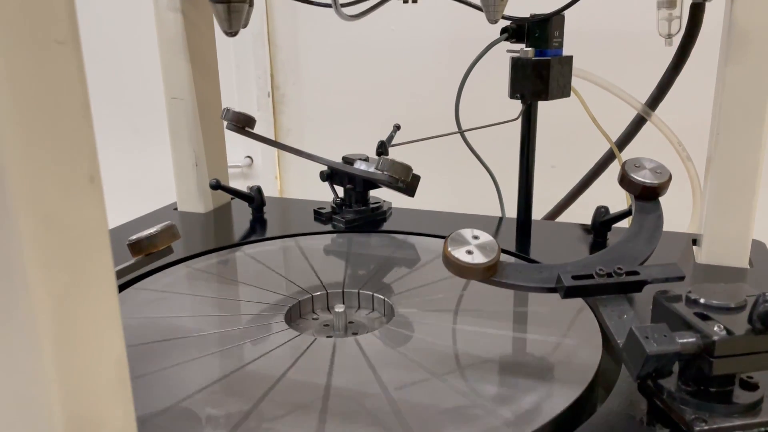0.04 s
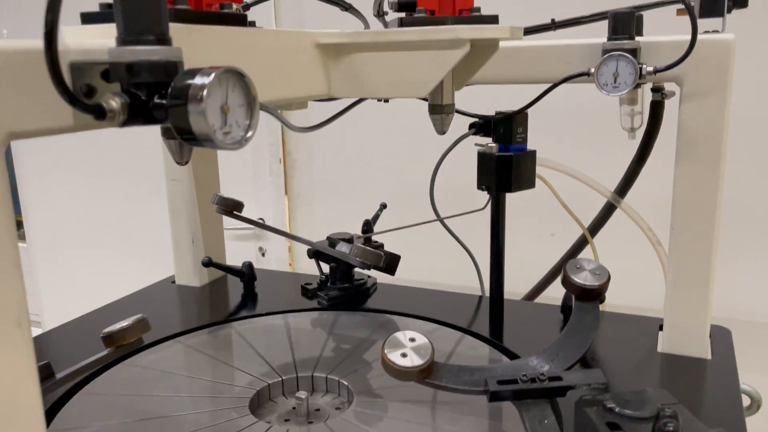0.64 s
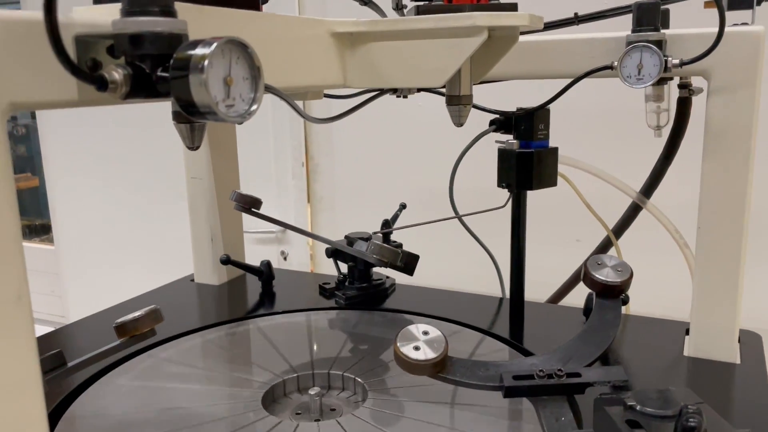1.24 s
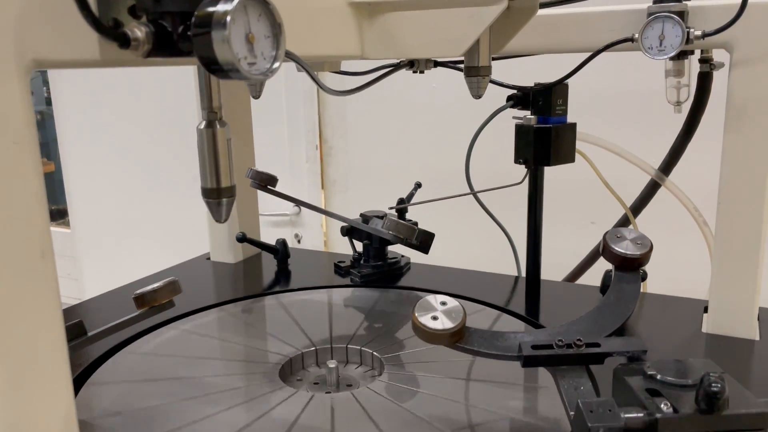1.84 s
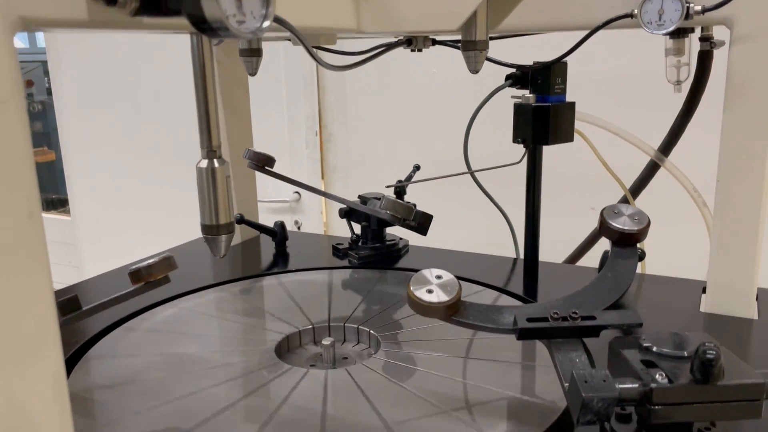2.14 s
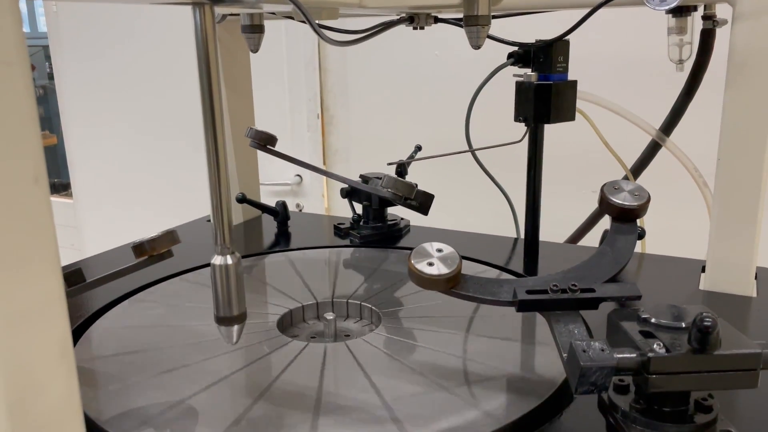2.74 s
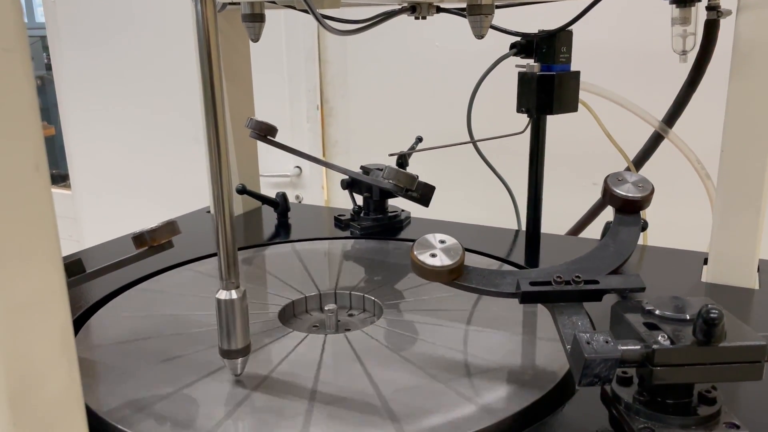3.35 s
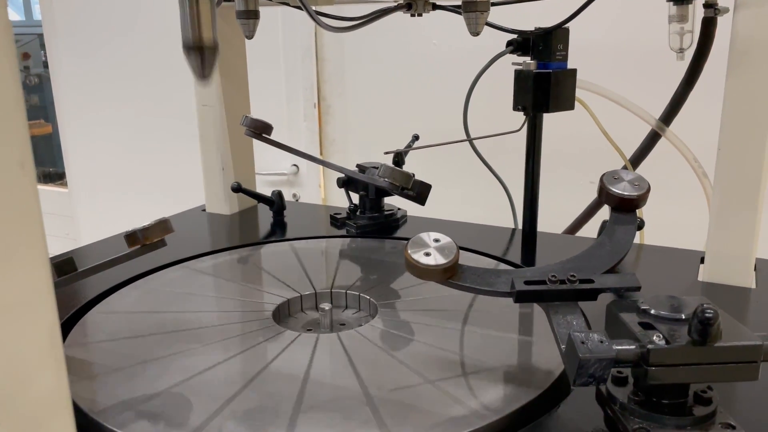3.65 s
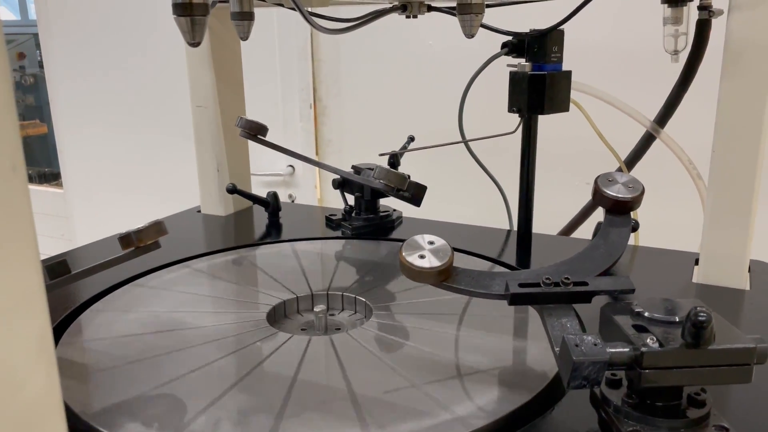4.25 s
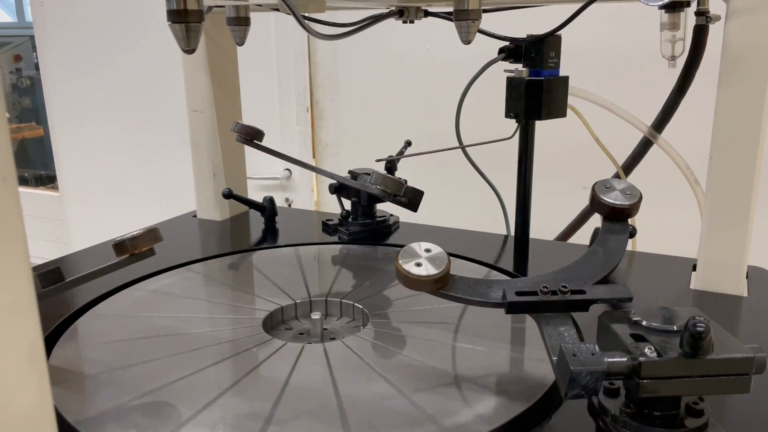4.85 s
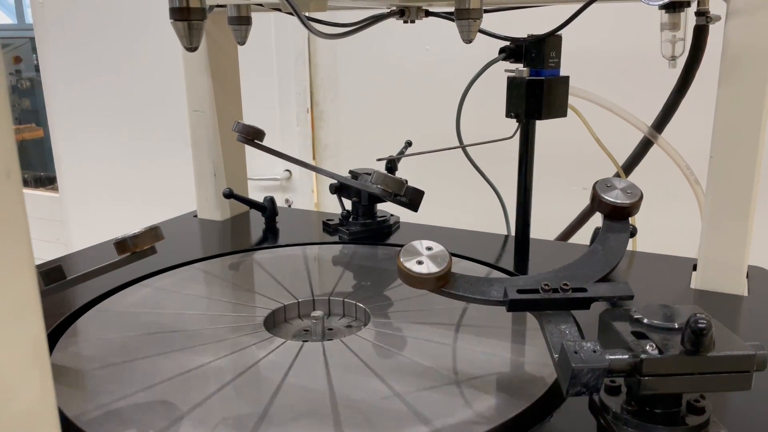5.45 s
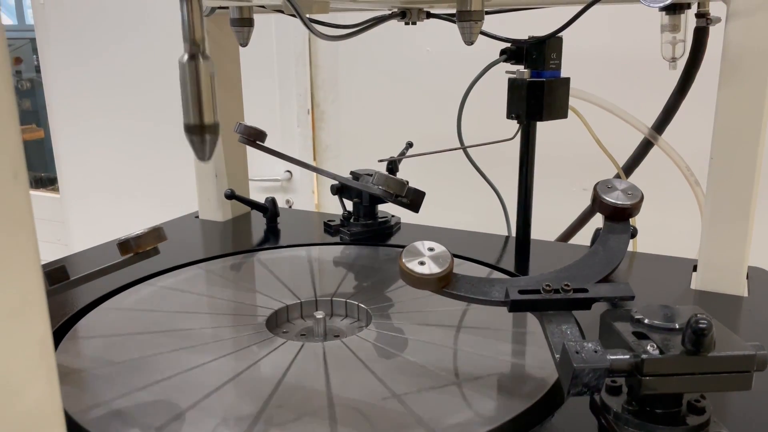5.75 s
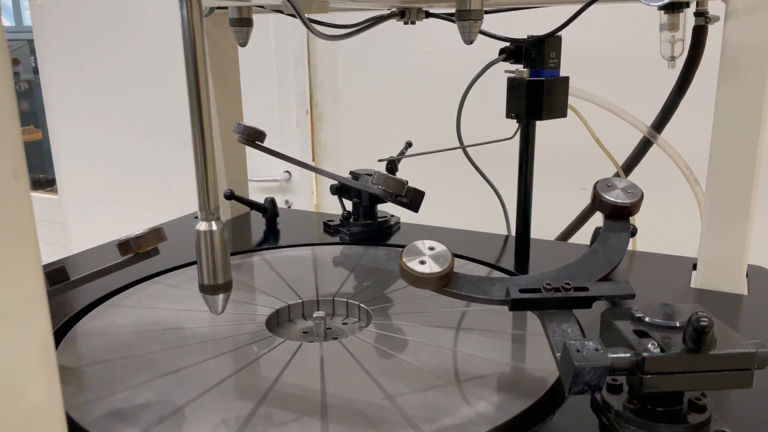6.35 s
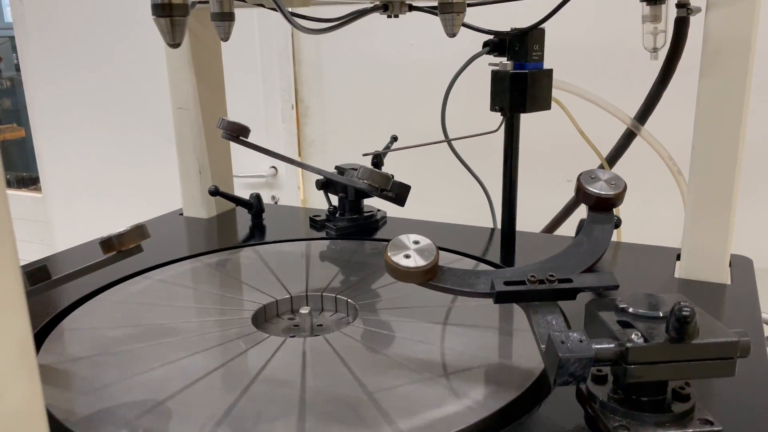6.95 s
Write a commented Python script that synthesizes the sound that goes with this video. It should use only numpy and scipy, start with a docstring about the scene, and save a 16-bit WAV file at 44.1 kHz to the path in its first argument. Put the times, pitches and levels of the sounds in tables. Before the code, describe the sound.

An air cylinder hisses and blasts through two strokes, with metal knocks, over a machine humming steadily in a workshop.

```python
"""An air cylinder lowers and raises a steel rod twice, over a lapping machine humming in a workshop.
Each stroke: the valve spits, air hisses through a throttle as the rod sinks, the exhaust blasts,
a narrow port whistles as the pressure drains, and the rod knocks against its stop in the frame.
The air is turbulent noise coloured by its passages; the knocks ring the frame's modes.
Behind them are the drive's motor and gear tones and the rumble of the turning plate."""
import sys
import numpy as np
from scipy import signal
from scipy.fft import rfft, irfft, next_fast_len
from scipy.io import wavfile
from scipy.ndimage import map_coordinates

SR = 44100
rng = np.random.default_rng(int(sys.argv[2]) if len(sys.argv) > 2 else 0)


def master(y):
    """Save y as 16-bit WAV."""
    cut = np.clip(np.atleast_2d(y).T, -1, 1)
    pcm = np.round(cut * 32767)  # scale
    wavfile.write(sys.argv[1], SR, pcm.astype(np.int16))


N = 308700
TIME = np.arange(N) / SR
FFT_SIZE = next_fast_len(N + 8192, True)
SIDES = np.array([[1], [-1]])  # left, right
WAVER_HZ = 435  # reference pitch for the unsteadiness of tones and modes


def amp(db):
    """Decibels to gain."""
    return 10 ** (np.asarray(db) / 20)


def along(points, hz):
    """(Hz, value) points read on a log axis."""
    knots_hz, values = np.transpose(points)
    return np.interp(np.log(hz + 1), np.log(knots_hz + 1), values)


def ramp(start_s, length_s):
    """Linear rise from 0 to 1."""
    return np.clip((TIME - start_s) / length_s, 0, 1)


def fade(start_s, t60_s):
    """Holds at 1 until start_s, then decays."""
    return amp(-60 * np.maximum(TIME - start_s, 0) / t60_s)


def puffs(rows):
    """Envelope of short rounded swells."""
    return sum(amp(db) * np.exp(-((TIME - centre_s) / half_s) ** 4) for centre_s, db, half_s in rows)


def wobble(rate_hz):
    """Smooth random curve, rate_hz knots a second."""
    knots = rng.standard_normal(int(N * rate_hz / SR) + 4)
    coarse = np.arange(0, N + 64, 64)
    return np.interp(np.arange(N), coarse, map_coordinates(knots, [coarse * rate_hz / SR], order=2))


def filtered(x, response):
    """x through a complex frequency response."""
    return irfft(rfft(x, FFT_SIZE) * response(np.fft.rfftfreq(FFT_SIZE, 1 / SR)), FFT_SIZE)[..., :N]


# Phase between channels. Each row: frequency in Hz, left lead in radians.
STEREO_PHASE = [(200, 0), (700, -.8), (1700, -.8), (2400, .5), (5300, .5), (6000, -1.2), (6800, -1.3),
                (7600, -2.75), (9500, -3.6), (11000, -4.6), (13200, -6.28)]
def left_lead(hz):
    """Radians by which left leads right."""
    return along(STEREO_PHASE, hz)


# Likeness of the channels. Each row: frequency in Hz, coherence from 0 to 1.
COHERENCE = [(40, .99), (200, .95), (350, .85), (600, .5), (1900, .55), (2300, .85), (3100, .55),
             (3800, .88), (5000, .35), (6000, .45), (7000, .8), (8500, .98), (10000, .83), (12700, .88),
             (13200, 1)]
def rush(colour_db, balance, lead=left_lead):
    """Coloured, partly coherent stereo noise at rms 1."""
    hz = np.fft.rfftfreq(FFT_SIZE, 1 / SR)
    common, apart = rng.standard_normal((2, len(hz))) + 1j * rng.standard_normal((2, len(hz)))
    angle = np.arccos(np.clip(along(COHERENCE, hz), 0, 1)) / 2
    pair = np.cos(angle) * common + SIDES * np.sin(angle) * apart
    placement = amp(SIDES * along(balance, hz) / 2) * np.exp(0.5j * SIDES * lead(hz))
    noise = irfft(pair * placement * amp(colour_db(hz)), FFT_SIZE)[:, :N]
    return noise / np.sqrt(np.mean(noise ** 2) + 1e-20)


# Wall reverberation. Each row: frequency in Hz, t60 in seconds.
WALL_DECAY = [(150, 0.33), (1500, 1), (12000, 0.049)]
def room(x):
    """The walls answer, the treble dying first; the bass is alike on both sides."""
    hz, t, noise = signal.stft(rng.standard_normal((2, SR // 2)), SR, nperseg=256)
    width = np.clip(hz / 900, 0, 1)[:, None]
    pair = np.array([noise[0] + width * noise[1], noise[0] - width * noise[1]]) / np.sqrt(1 + width ** 2)
    decay = amp(-60 * t / along(WALL_DECAY, hz)[:, None])
    tail = signal.istft(pair * decay, SR, nperseg=256)[1]
    return signal.fftconvolve(x, tail / np.linalg.norm(tail[0]), axes=1)[:, :N]


# Plate noise and workshop hiss. Each row: frequency in Hz, relative density in dB.
PLATE_SPECTRUM = [(15, -16), (28, -14), (42, 13), (56, 10), (75, -4), (170, 0.5), (270, -3.5), (460, 2.5),
                  (680, 0), (800, -8), (1300, -3), (1650, -8.5), (2000, -17.5), (2700, -14)]
HISS_SPECTRUM = [(1500, -39), (2800, -17), (4000, 3.5), (5000, 2.5), (6500, 1), (7200, 12), (8000, -2),
                 (10000, 6.5), (13000, 2), (14800, 5), (15500, 15), (16000, -11)]
# Workshop balance. Each row: frequency in Hz, left minus right in dB.
SHOP_BALANCE = [(50, -1.5), (150, 4.5), (300, 7), (600, -3.5), (2000, 1), (7600, 0.8)]
# Course of the deep rumble. Each row: time in seconds, relative level in dB.
RUMBLE_LEVELS = [(0.0, -55), (0.45, -61), (2.98, -55.5), (3.33, -52), (4.78, -57), (6.8, -51.5), (7.0, -50)]
def workshop(plate_db=-49, hiss_db=-62, edge_hz=3000, rumble_hz=80, rumble_lift_db=3.5):
    """Rumble and rubbing of the turning plate, with a faint steady hiss."""
    plate_colour = lambda hz: along(PLATE_SPECTRUM, hz) - 10 * np.log10(1 + (hz / edge_hz) ** 10)
    plate = rush(plate_colour, SHOP_BALANCE)
    hiss = rush(lambda hz: along(HISS_SPECTRUM, hz), SHOP_BALANCE)
    swell_db = np.interp(TIME, *np.transpose(RUMBLE_LEVELS))
    swell = amp(rumble_lift_db + swell_db - swell_db.mean())
    rumble = filtered(plate, lambda hz: 1 / (1 + (hz / rumble_hz) ** 6))
    return amp(plate_db) * (plate + (swell - 1) * rumble) + amp(hiss_db) * hiss


# Motor and gear tones. Each row: frequency in Hz, nominal rms level in dB.
DRIVE_TONES = [(207.6, -52.5), (328.4, -73), (371.4, -71), (409, -64.5), (446.8, -57), (500, -62.5),
               (549, -72), (619.5, -57), (689, -58), (829, -67), (1001, -69), (1114, -67), (1238, -63),
               (1281, -77), (1358, -74), (1647, -70), (1769, -72), (2790, -85), (3198, -89), (3390, -81),
               (3521, -82)]
def drive(waver_db=2.5, drift_rad=0.58, rough_db=2, rough_hz=22, jitter_rad=0.28, pan_db=0.6):
    """Motor and gears hum; the higher tones waver more and are roughened by the gears' play."""
    out = np.zeros((2, N))
    settling_db = 0.5 * (1 - ramp(0, 0.35))
    for hz, db in DRIVE_TONES:
        ratio = hz / WAVER_HZ
        depth = min(ratio, 1)
        phase = 2 * np.pi * (hz * TIME + rng.random()) + drift_rad * ratio * wobble(5)
        phase += jitter_rad * depth ** 2 * wobble(rough_hz)
        unsteady_db = waver_db * depth * wobble(3.81) + rough_db * depth ** 2 * wobble(rough_hz)
        gain = amp(db + settling_db * (hz > WAVER_HZ) + unsteady_db)
        out += gain * np.sqrt(2) * np.sin(phase + SIDES * left_lead(hz))
    return out * amp(SIDES * pan_db)


# Seal judders. Each row: centre in seconds, level in dB, half length in seconds.
JUDDERS = [(1.618, -43.5, 0.069), (3.78, -44, 0.06), (5.7, -48.5, .06)]
# The frame's response to them. Each row: frequency in Hz, relative density in dB.
JUDDER_SPECTRUM = [(70, -33), (115, -11), (140, -2), (175, 2.5), (230, -13), (400, -18), (900, -47)]
def seal_judder():
    """The seals stick and slip as the rod starts or settles: a soft rumble low in the frame."""
    return rush(lambda hz: along(JUDDER_SPECTRUM, hz), SHOP_BALANCE) * puffs(JUDDERS)


# Steel frame modes. Each row: frequency in Hz, level in dB with rod up, with rod out, t60 in seconds.
FRAME_MODES = [(139.2, -16, -1.5, 0.51), (178, -2, -3, 0.73), (230, -26, -6.5, 0.19),
               (275.6, -24, -4, 0.22), (328.5, 2, 0.5, 0.21), (408, 5, -3, 0.11), (452, 4, 7.5, 0.085),
               (504, -17, 7, 0.072), (710, -36, -19, .3), (807, -15, -10, 0.24), (848, -5, -10, 0.24),
               (946, -23, -4, 0.11), (1088, -2, -1, .14), (1116, -0.5, -0.5, 0.18), (1234, 10.5, -20, 0.11),
               (1395, 6, 1.5, 0.071), (1465, -7, 6.5, 0.051), (1737, 9, 1, 0.11)]
def frame_ring(t, rod_out, build_cycles=2.8, rough_rad=0.71, rough_hz=90):
    """Each mode builds over a few cycles and decays; loose fittings roughen the higher ones."""
    ring = np.zeros(len(t))
    for hz, up_db, out_db, t60_s in FRAME_MODES:
        gain = amp((out_db if rod_out else up_db) + rng.normal(0, 1))
        jitter = map_coordinates(rng.standard_normal(len(t)), [t * rough_hz], order=1)
        phase = 2 * np.pi * (hz * t + rng.random()) + rough_rad * np.sqrt(hz / WAVER_HZ) * jitter
        envelope = (1 - np.exp(-t * hz / build_cycles)) * amp(-60 * t / t60_s)
        ring += gain * envelope * np.sin(phase)
    return ring


# Jolts of the rod. Each row: start in seconds, gain in dB, contact cutoff in Hz,
# rod out if nonzero, clatter t60 in seconds, relative ring gain in dB.
KNOCKS = [(.205, -39.5, 800, 0.022, 0.055, -3), (0.225, -45, 1000, 0.085, 0.042, 2),
          (3.044, -24.5, 1500, 1, 0.055, -2.5), (3.068, -17.5, 1850, 1, 0.043, -2),
          (3.907, -38, 1300, 0, 0.047, -6), (3.915, -26, 1000, 0, .07, -2.5), (3.943, -32, 220, 0, .07, -9),
          (6.95, -30.5, 1180, 0.14, 0.051, -12), (6.958, -27, 970, 0, 0.071, -1.5)]
def rod_knocks(clatter_db=14.5, tick_db=-21, attack_s=0.0018, width=0.97, lowest_hz=115):
    """The rod jolts the frame: a ring, a dry clatter and a faint tick. Harder contact is brighter."""
    out = np.zeros((2, N + SR))
    t = np.arange(SR * 3 // 4) / SR
    tick_band = signal.butter(2, [1800, 4200], "band", fs=SR)
    for start_s, db, cutoff_hz, rod_out, clatter_t60_s, ring_db in KNOCKS:
        ring = amp(ring_db) * frame_ring(t, rod_out)
        grit = rng.standard_normal(len(t)) + width * rng.standard_normal((2, len(t)))
        clatter = amp(clatter_db - 60 * t / clatter_t60_s) * (1 - np.exp(-t / attack_s)) * grit
        tick = amp(tick_db) * signal.lfilter(*tick_band, clatter)
        body = signal.lfilter(*signal.butter(4, cutoff_hz, fs=SR), ring + clatter)
        onset = round(start_s * SR)
        out[:, onset:onset + len(t)] += amp(db) / 2 * (body + tick)
    # the frame barely radiates below its lowest mode
    radiated = signal.sosfilt(signal.butter(4, lowest_hz, "high", fs=SR, output="sos"), out[:, :N])
    return filtered(radiated, lambda hz: np.exp(0.5j * SIDES * left_lead(hz)))


# Reflections off plate, beam and posts. Each row: delay in seconds, gain.
BOUNCES = [(0.002066, 0.062), (0.00221, 0.024), (0.003124, 0.0038), (0.003436, 0.1), (0.003936, 0.032),
           (0.007198, -0.039), (0.008128, 0.057)]
# Jet balance. Each row: frequency in Hz, left minus right in dB.
JET_BALANCE = [(200, 0), (700, 1), (1000, 5), (1500, 3), (2100, -.5), (2950, 10.5), (3700, -.5),
               (4100, -.5), (4950, 8), (6400, .5), (7200, 1.5), (9500, -.5), (13000, 0)]
# The jets sit to the left. Each row: frequency in Hz, extra left lead in radians.
JET_LEAD = [(250, 0), (700, .8), (1400, 3.3), (2200, 6), (2900, 6.7), (3400, 5.4), (4450, 7), (5600, 6.28)]
def jet(spectrum, cavity, bounce=1.0):
    """Turbulence of spectrum (Hz, dB), lifted at cavity peaks (Hz, width Hz, dB), combed by bounces."""
    grid_hz = np.fft.rfftfreq(8192, 1 / SR)
    lift_db = sum(db / (1 + (2 * (grid_hz - hz) / width_hz) ** 2) for hz, width_hz, db in cavity)
    reflected = sum(gain * np.exp(-2j * np.pi * grid_hz * delay_s) for delay_s, gain in BOUNCES)
    comb_db = 20 * np.log10(abs(1 + bounce * reflected) + 1e-3)
    colour_db = lambda hz: along(spectrum, hz) + np.interp(hz, grid_hz, lift_db + comb_db)
    return rush(colour_db, JET_BALANCE, lead=lambda hz: left_lead(hz) + along(JET_LEAD, hz))


def flow(air, gain, bright_db, flutter_db=0, split_hz=6000):
    """A jet shaped by its flow: gain, treble tilt and optional turbulent flutter."""
    low = filtered(air, lambda hz: 1 / (1 + (hz / split_hz) ** 6))
    treble_gain = amp(bright_db)
    tilted = (low + treble_gain * (air - low)) / np.sqrt((1 + treble_gain ** 2) / 2)
    return gain * amp(flutter_db * wobble(70)) * tilted


# Port turbulence. Each row: frequency in Hz, relative density in dB.
PORT_JET = [(600, 16.5), (2300, 9.5), (4000, 2), (6000, -2), (10500, 6.5), (13000, 2.5), (15500, -22)]
# Port resonances. Each row: centre in Hz, width in Hz, lift in dB.
PORT_CAVITY = [(5296, 150, 23), (7210, 280, 27), (10400, 400, 5), (11900, 320, 10.6), (12140, 300, 22.5),
               (12700, 280, 16)]
# Pressure drains. Each row: start in seconds, level in dB, emptying time in seconds.
DRAINS = [(3.72, -39, 1), (5.6, -41.5, 1.46), (6.77, -40.5, 0.85)]
def port_whistle(rise_s=0.0049, flow_exponent=2.3, dribble_db=-15.5, dribble_t60_s=8.8):
    """Draining air whistles hoarsely in a narrow port; the treble dies first and a dribble lingers."""
    gain = np.zeros(N)
    for start_s, db, empty_s in DRAINS:
        pressure = 1 - ramp(start_s + rise_s, empty_s)
        dribble = amp(dribble_db) * fade(start_s, dribble_t60_s)
        gain += amp(db) * ramp(start_s, rise_s) * (pressure ** flow_exponent + dribble)
    bright_db = 0.49 * (20 * np.log10(gain + 1e-6) + 44)  # no tilt at -44 dB
    return flow(jet(PORT_JET, PORT_CAVITY, bounce=0.35), gain, bright_db, flutter_db=0.6)


# Valve turbulence. Each row: frequency in Hz, relative density in dB.
VALVE_JET = [(150, -6), (700, -6.5), (1800, -2), (2400, -7.5), (4500, 4.5), (5800, 5.5), (7000, 10.5),
             (13000, -0.5), (15600, -4.5)]
# Valve resonances. Each row: centre in Hz, width in Hz, lift in dB.
VALVE_CAVITY = [(1160, 390, 3.3), (2590, 590, 14.2), (4070, 560, 11), (6490, 560, 5), (10800, 550, 5.3),
                (12000, 310, 8.4), (13330, 570, 16), (14800, 550, 5.8)]
# Changeovers. Each row: start in seconds, level in dB, hold in seconds, t60 in seconds.
SPITS = [(1.3212, -14, 0.02, 0.056), (4.971, -17.5, 0.023, 0.12)]
# Leaks past spool and seals. Each row: centre in seconds, level in dB, half length in seconds.
SQUEEZES = [(.226, -63, 0.019), (1.305, -37.5, 0.018), (1.595, -29, 0.0075), (3.45, -39.5, 0.024),
            (4.956, -39.5, 0.028)]
def valve(opening_s=0.012, open_bright_db=5, dulling_db=7):
    """Air squeezes thinly past spool and seals; each changeover spits, dulling as it fades."""
    gain, pressure = np.zeros((2, N))
    for start_s, db, hold_s, t60_s in SPITS:
        decay = fade(start_s + hold_s, t60_s)
        gain += amp(db) * ramp(start_s, opening_s) ** 2 * decay
        pressure += ramp(start_s - opening_s, opening_s) * decay
    thin = jet([(1500, -28), (3300, 2), (4200, -1), (9000, -13)], [(3670, 430, 12.6), (6700, 350, 12)])
    air = jet(VALVE_JET, VALVE_CAVITY, bounce=0.99)
    bright_db = open_bright_db - dulling_db * (1 - pressure)
    return flow(air, gain, bright_db, flutter_db=1, split_hz=11000) + puffs(SQUEEZES) * thin


# Throttle turbulence, per stroke. Each row: frequency in Hz, relative density in dB.
FIRST_JET = [(150, -40), (700, -8.5), (1750, -3), (2400, -5.5), (4500, -1), (5800, -12), (7000, 1),
             (8500, -2.5), (13000, -0.8), (15600, -7.5)]
SECOND_JET = [(150, -27), (700, -9), (1750, -4.5), (2400, -10), (4500, -8.5), (5800, -11), (7000, 0),
              (8500, 2.5), (13000, 2), (15600, -6)]
# Throttle resonances, per stroke. Each row: centre in Hz, width in Hz, lift in dB.
FIRST_CAVITY = [(900, 134, 2.3), (2250, 200, 7.8), (2440, 170, 5.4), (2737, 400, 9.4), (3450, 310, 7.5),
                (3890, 370, 9.6), (4780, 370, 4.9), (5320, 160, 8.9), (6238, 102, 3.6), (6630, 560, 5.7),
                (10110, 960, 7.7), (10800, 180, 3.3), (12100, 630, 5.6), (13300, 700, 5.9)]
SECOND_CAVITY = [(2292, 92, 9.7), (2566, 400, 10), (2810, 210, 5.3), (3320, 390, 6.5), (3900, 520, 11.3),
                 (4500, 360, 8.7), (5320, 451, 7.5), (6350, 420, 5.8), (6850, 220, 3.5), (10440, 2050, 6.2),
                 (11050, 260, 2.6), (12600, 1200, 4.6)]
# Down strokes. Each row: times in seconds of valve opening, rod breaking free and valve shutting,
# level in dB, brightness in dB while filling and while sinking.
DESCENTS = [(1.34, 1.508, 3.03, -30.5, 2, -1), (4.978, 5.583, 6.41, -30.5, -4.5, -2.5)]
# Flow surges and lulls. Each row: start and length in seconds, level and brightness change in dB,
# rise and fall in seconds.
SURGES = [(1.516, 0.064, 4, 4, .035, 0.042), (2.649, 0.15, 6, 4, 0.029, 0.016),
          (2.835, 0.15, -2, 2.5, 0.047, .04)]
def throttle(opening_s=0.021, closing_s=0.02, seep_s=0.044, seep_db=-8, seep_bright_db=-8,
             sag_db=4, break_free_s=0.089):
    """Air seeps, fills the chamber ever more slowly, then meters out while the rod sinks."""
    surge_db, surge_bright_db = sum(
        np.outer([db, bright_db], ramp(start_s, rise_s) - ramp(start_s + length_s, fall_s))
        for start_s, length_s, db, bright_db, rise_s, fall_s in SURGES)
    passages = (FIRST_JET, FIRST_CAVITY), (SECOND_JET, SECOND_CAVITY)
    out = np.zeros((2, N))
    for descent, passage in zip(DESCENTS, passages):
        open_s, free_s, shut_s, db, fill_bright_db, sink_bright_db = descent
        opened, sinking = ramp(open_s, opening_s), ramp(free_s, break_free_s)
        seeping, filling = 1 - opened, opened * (1 - sinking)
        level_db = db + seep_db * seeping - sag_db * filling * ramp(open_s, free_s - open_s) + surge_db
        bright_db = seep_bright_db * seeping + fill_bright_db * filling + sink_bright_db * sinking
        gate = ramp(open_s - seep_s, opening_s) * (1 - ramp(shut_s, closing_s))
        out += flow(jet(*passage), gate * amp(level_db), bright_db + surge_bright_db, flutter_db=0.52)
    return out


# Exhaust turbulence. Each row: frequency in Hz, relative density in dB.
EXHAUST_JET = [(150, -17.5), (700, -11.5), (1750, -5.5), (2400, -13.5), (4500, -9.5), (5800, -14.5),
               (7000, 1), (8500, -3), (13000, -7.5), (15600, -19.5)]
# Exhaust resonances. Each row: centre in Hz, width in Hz, lift in dB.
EXHAUST_CAVITY = [(830, 71, 4.9), (2262, 67, 11.3), (2404, 170, 10), (2584, 200, 13.2), (2820, 183, 12),
                  (3290, 320, 6.6), (3925, 350, 13.1), (4430, 200, 9.9), (4540, 45, 9.1), (4800, 120, 4.5),
                  (5045, 120, 6.4), (5490, 600, 9.5), (5700, 73, 5.7), (6270, 51, 8.3), (6340, 220, 4.5),
                  (6400, 60, 3.7), (6800, 77, 7.2), (11040, 1900, 8.2), (11780, 160, 6), (12500, 240, 5.4),
                  (12860, 260, 7.5), (13600, 400, 7.2), (14700, 1200, 8.1)]
# Exhaust blasts. Each row: start in seconds, level in dB, rise and emptying time in seconds,
# gulp level in dB, gulp t60 in seconds.
BLASTS = [(3.029, -15.5, 0.031, 0.6, -33, 0.11), (6.405, -15, 0.015, 0.41, -25, 0.053)]
# Up strokes. Each row: start in seconds, stop in seconds, level in dB.
RETURNS = [(3.464, 3.718, -22), (6.438, 6.752, -22.5)]
def exhaust(flow_exponent=2.46, full_bright_db=2, dulling_db=6.5, speed_up_s=0.08, cutoff_s=0.025,
            afterflow_db=-19, afterflow_t60_s=1, afterflow_bright_db=-6):
    """The cylinder dumps its pressure; the rising rod drives air out, and a little escapes after."""
    flows = []  # (gain, brightness in dB)
    for start_s, db, rise_s, empty_s, _, _ in BLASTS:
        pressure = 1 - ramp(start_s + rise_s, empty_s)
        blast = amp(db) * ramp(start_s, rise_s) * pressure ** flow_exponent
        flows.append((blast, full_bright_db - dulling_db * (1 - pressure)))
    for start_s, stop_s, db in RETURNS:
        speed = 1 - np.exp(-np.maximum(TIME - start_s, 0) / speed_up_s)
        stopped = ramp(stop_s, cutoff_s)
        pushed = amp(db) * speed * (1 - stopped)
        afterflow = amp(db + afterflow_db) * stopped * fade(stop_s, afterflow_t60_s)
        flows += [(pushed, 0), (afterflow, afterflow_bright_db)]
    power = sum(gain ** 2 for gain, _ in flows)
    bright_db = sum(gain ** 2 * db for gain, db in flows) / (power + 1e-20)
    return flow(jet(EXHAUST_JET, EXHAUST_CAVITY), np.sqrt(power), bright_db)


def exhaust_whistle(db=-36, after_s=0.28, half_s=0.088):
    """The long first blast narrows to a hoarse whistle as it runs out."""
    reedy = jet([(2500, -43), (4400, -10), (5000, -4), (7000, -34)], [(4470, 190, 24)], bounce=0.4)
    return reedy * puffs([(BLASTS[0][0] + after_s, db, half_s)])


def exhaust_gulps(delay_s=0.02, rise_s=0.0043, hold_s=0.022):
    """Each blast opens with a hollow gulp."""
    hollow = jet(spectrum=[(300, -33), (650, -9), (1200, 2), (2000, -18), (4000, -23)],
                 cavity=[(730, 170, 4.5), (970, 210, 19)])
    return hollow * sum(amp(db) * ramp(start_s + delay_s, rise_s) * fade(start_s + hold_s, t60_s)
                        for start_s, *_, db, t60_s in BLASTS)


def scene(knock_room_db=-13, valve_room_db=-18, knock_pan_db=0.7):
    """Machine, air and frame together; the knocks and the valve echo off the walls."""
    knocks, spits = rod_knocks(), valve()
    echoes = amp(knock_room_db) * room(knocks) + amp(valve_room_db) * room(spits)
    background = drive() + workshop()
    strokes = throttle() + exhaust() + exhaust_whistle() + exhaust_gulps() + seal_judder()
    return background + strokes + port_whistle() + spits + knocks * amp(SIDES * knock_pan_db) + echoes


def record(dry):
    """Brick-wall low-pass at 15850 Hz."""
    return filtered(dry, lambda hz: hz < 15850)


dry = scene()
out = record(dry)
master(out)
```